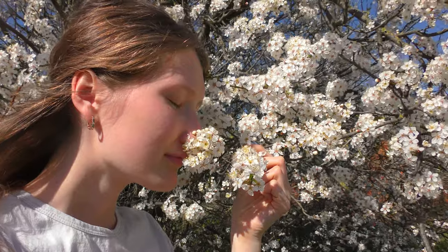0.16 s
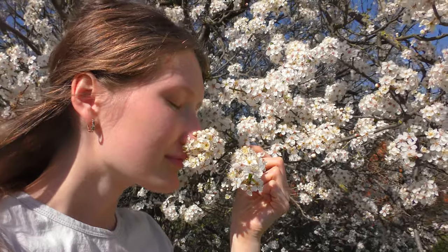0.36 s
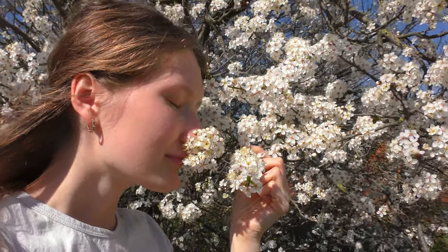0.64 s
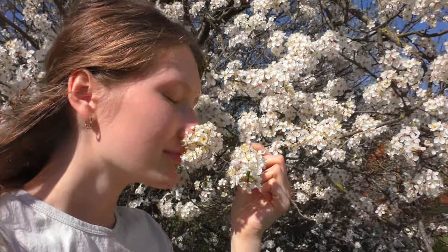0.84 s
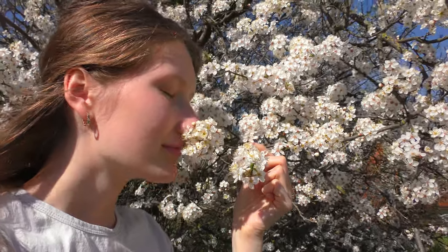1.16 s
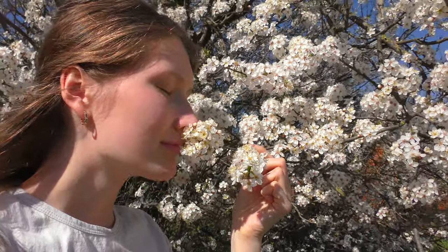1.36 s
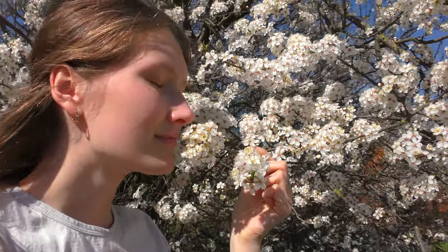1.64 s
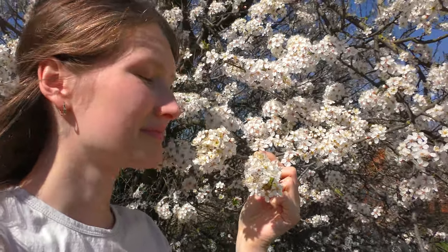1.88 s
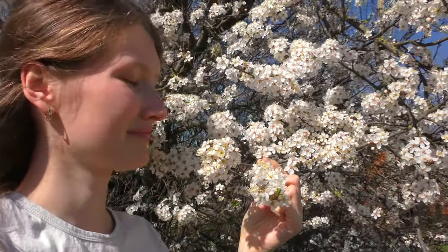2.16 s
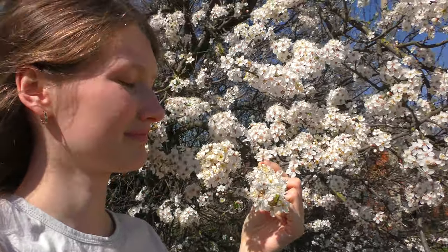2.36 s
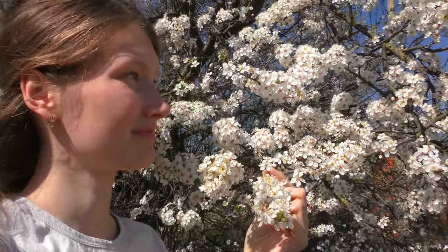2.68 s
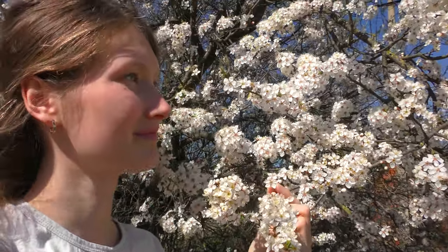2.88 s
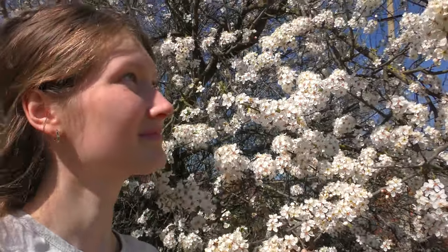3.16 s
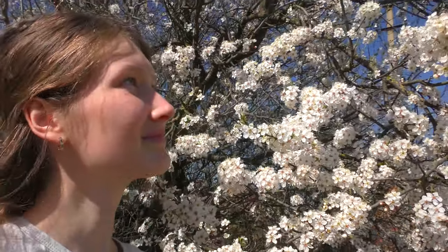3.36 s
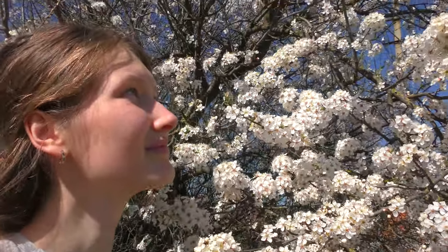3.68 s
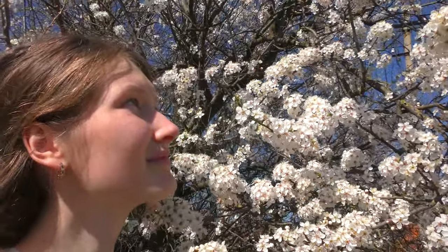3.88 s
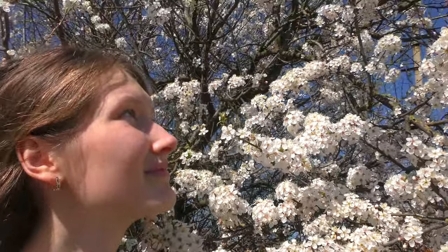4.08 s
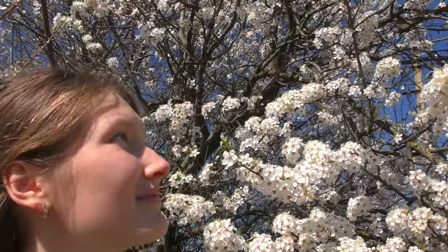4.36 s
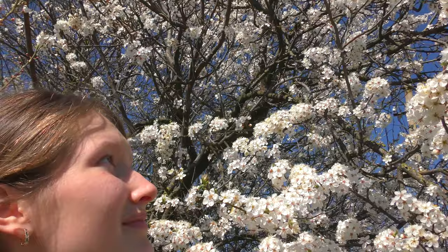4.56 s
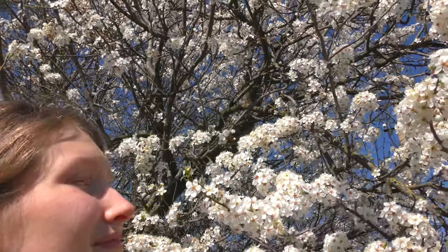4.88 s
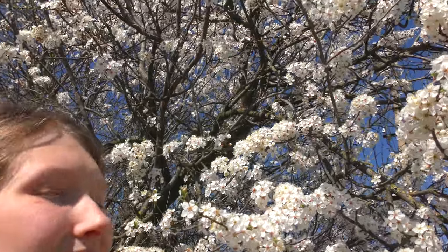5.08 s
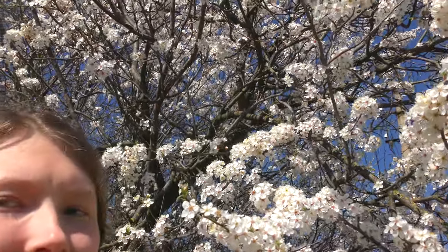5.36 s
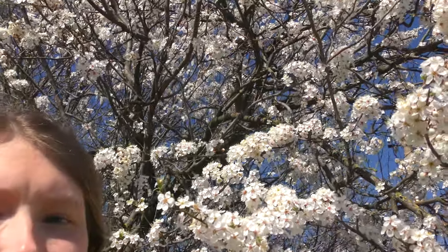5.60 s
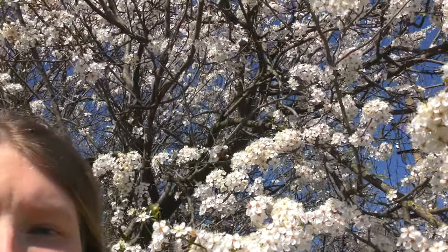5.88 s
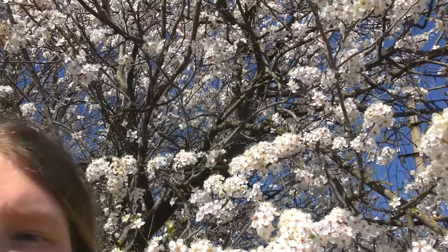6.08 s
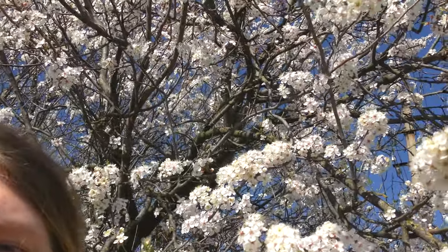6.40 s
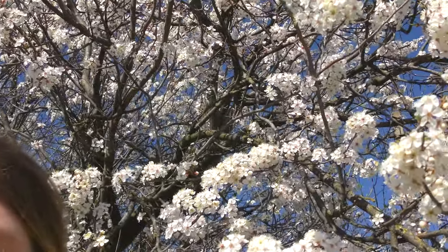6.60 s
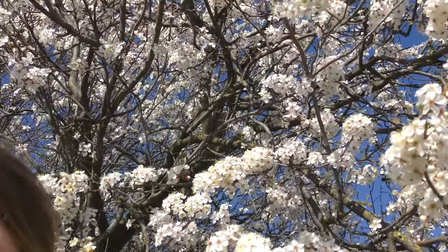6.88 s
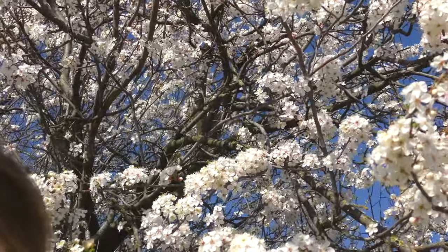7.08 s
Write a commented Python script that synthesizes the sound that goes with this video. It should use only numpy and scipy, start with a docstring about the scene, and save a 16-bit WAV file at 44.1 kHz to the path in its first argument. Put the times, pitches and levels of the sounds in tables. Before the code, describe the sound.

A small songbird twitters in rapid bursts to the left while bees hum faintly in blossom and wind thuds low against the microphone.

```python
"""Bees and a songbird under a flowering tree

Many bees hum softly, each a wandering stack of wingbeat tones, and the nearest one passes again and again.
A small songbird twitters in quick phrases to the left: curved, doubled tones with a faint garden echo.
A few decaying tones make one small ping, and short swells of filtered noise are twigs brushing together.
Gusts of shaped noise and brief pressure swings buffet the microphone, over a steady hush of open air."""
import sys
import numpy as np
from scipy import signal
from scipy.fft import rfft, irfft, next_fast_len
from scipy.io import wavfile

SR = 44100
rng = np.random.default_rng(int(sys.argv[2]) if len(sys.argv) > 2 else 0)


def waveform_to_disk(signal):
    """Save audio, clipped to [-1, 1], as 16-bit WAV at the path in sys.argv[1]."""
    frames = np.transpose(np.atleast_2d(signal))
    scaled = np.clip(frames, -1, 1) * 32767
    samples = np.round(scaled).astype(np.int16)
    wavfile.write(sys.argv[1], SR, samples)


N = 319284
TIME = np.arange(N) / SR  # seconds


def amp(db):
    """Turns decibels into a gain."""
    return 10 ** (np.asarray(db) / 20)


def unit(x):
    """Scales a sound to an rms (average strength) of one."""
    return x / np.sqrt(np.mean(x ** 2) + 1e-20)


def at_hz(points, hz):
    """Reads a curve over frequency, with the frequency axis logarithmic as in hearing."""
    point_hz, value = np.transpose(points)
    return np.interp(np.log(hz + 1), np.log(point_hz + 1), value)


def over_time(rows):
    """Reads a curve over time at every sample."""
    return np.interp(TIME, *np.transpose(rows))


def add(mix, s, sound):
    """Mixes a sound in, starting at a given second."""
    part = mix[max(round(s * SR), 0):][:len(sound)]
    part += sound[:len(part)]


def drift(rate_hz):
    """Makes a random wander of unit size by smoothing away changes faster than the rate."""
    points = rng.standard_normal(2048)
    hz = np.fft.rfftfreq(2048, TIME[-1] / 2047)
    slow = unit(irfft(rfft(points) / (1 + (hz / rate_hz) ** 4)))
    return np.interp(TIME, np.linspace(0, TIME[-1], len(slow)), slow)


def noise(spectrum, likeness):
    """Makes two channels of coloured noise that share a part and differ in the rest."""
    size = next_fast_len(N, True)
    hz = np.fft.rfftfreq(size, 1 / SR)
    common, apart = rfft(rng.standard_normal((2, size))) * amp(at_hz(spectrum, hz))
    same = np.clip(at_hz(likeness, hz), 0, 1)
    mid = common * np.sqrt(1 + same)
    side = apart * np.sqrt(1 - same)
    return unit(irfft([mid + side, mid - side], size)[:, :N])


# Loudness of the whole swarm farther up the tree.
# Each row: time in seconds, level in dB.
SWARM_LEVEL = [(0, -69.5), (1, -63.5), (2.5, -65.5), (3.6, -66.5), (4.3, -69.5), (5.5, -64.5), (6.5, -63),
               (7.24, -71)]


def bees(count=12, wing_hz=224, spread=.07, wander=.022, come_and_go_db=4):
    """Each bee of the swarm beats its wings at its own wandering rate and swells as it flies nearer."""
    swarm = np.zeros((2, N))
    for rank in np.linspace(-1, 1, count):
        buzz = wings(wing_hz * (1 + spread * rank + wander * drift(rate_hz=2.5)))
        place = np.pi / 4 + 0.17 * (rng.random() - .5)  # angle of the pan, near the centre
        pan = [np.cos(place), np.sin(place)]
        swarm += np.outer(pan, buzz * amp(come_and_go_db * drift(rate_hz=2.9)))
    return amp(over_time(SWARM_LEVEL)) * unit(swarm)


# Passes of the nearest bee.
# Each row: time when closest in seconds, average wingbeat rate when closest in Hz, level when closest in dB.
NEAR_BEE_PASSES = [(.9, 220, -75), (2.0, 215.3, -57.5), (4.15, 229.7, -62), (4.97, 214, -63),
                   (6.3, 214, -90), (6.85, 234, -63.5)]


def near_bee(pass_s=0.045, doppler=.006, wander=0.00833):
    """One bee works the closest flowers: on each pass it swells as 1 / distance and its pitch dips."""
    out = np.zeros(N)
    for s, wing_hz, db in NEAR_BEE_PASSES:
        # pass_s is the time to fly as far as the closest distance, which counts as one
        along = (TIME - s) / pass_s
        distance = np.hypot(1, along)
        # doppler is the share of pitch gained on approach and lost on leaving
        hz = wing_hz * (1 - doppler * along / distance + wander * drift(rate_hz=2.85))
        out += amp(db) / distance * wings(hz)
    return out


# Strength of the tones (partials) in a wingbeat, from the first upward.
# Each entry: relative level in dB.
WINGBEAT_PARTIALS = [-7.5, 3, -10.5, -15, -21, -3.5, -3.5, -9]


def wings(hz):
    """The buzz of one bee; each beat has two strokes, so the second partial is the strongest."""
    unsteady_hz = hz * (1 + 0.00532 * drift(rate_hz=31.2))
    phase = (2 * np.pi * (np.cumsum(unsteady_hz) / SR % 1)).astype(np.float32)
    buzz = 0
    for k, db in enumerate(WINGBEAT_PARTIALS):
        buzz = buzz + float(amp(db)) * np.sin((k + 1) * phase)
    return unit(buzz)


def bird(left_db=3.5, echo_left_db=2.0, echo_db=-7.5):
    """The song is louder on the left, the channels a sample apart, with the garden's echo behind it."""
    song = chirps()
    late_song = np.pad(song, (1, 0))[:N]
    direct = amp([[left_db], [-left_db]]) * np.array([late_song, song])
    echo = garden(song * amp(echo_db + facing_db(TIME)))
    return direct + amp([[echo_left_db], [-echo_left_db]]) * echo


# Notes of the song, before the bird's airflow and bends shake them.
# Each row: start in seconds, length in seconds, pitch at the start, middle and end in Hz,
# level halfway through in dB, octave level relative to the main tone in dB.
SONG_NOTES = [(0, 0.017, 6350, 5200, 3960, -52.5, -34), (0, 0.037, 3440, 2900, 2590, -58.5, -15),
              (.032, 0.022, 3000, 3650, 4900, -59, -23), (0.052, 0.045, 5050, 5370, 4780, -58, -25),
              (0.071, .012, 3500, 4300, 4700, -61, -25), (0.097, 0.048, 4500, 4400, 4500, -62, -25),
              (0.142, 0.055, 2870, 3430, 4100, -65.5, -6), (0.512, 0.012, 5000, 4200, 3500, -68, -15),
              (0.535, 0.044, 3080, 3670, 2980, -70, -24), (1.6, 0.048, 4080, 3840, 3320, -63, -16),
              (1.65, 0.017, 4040, 5000, 4800, -57, -11), (1.669, 0.025, 4640, 4490, 4400, -47, -26),
              (1.68, 0.007, 4400, 3950, 3500, -57, -25), (1.711, .024, 3580, 4200, 4830, -61, -27),
              (1.717, 0.019, 4190, 3710, 3200, -57, -27), (1.737, 0.029, 5490, 5640, 5960, -60.5, -20),
              (1.739, .022, 3240, 2960, 2680, -60, -22), (1.767, 0.0097, 4950, 4650, 4100, -51, -25),
              (1.815, 0.042, 3400, 4500, 4570, -56.5, -27), (1.83, 0.023, 5590, 5510, 5400, -54.5, -27),
              (1.852, 0.0081, 5400, 4940, 3900, -58, -23), (1.894, .064, 2820, 3584, 5000, -60.5, -16),
              (1.892, 0.017, 5500, 5750, 6000, -63, -25), (1.953, 0.0069, 4940, 5660, 6040, -56.5, -25),
              (2.476, .016, 4300, 4840, 5570, -72, -20), (2.492, .024, 4740, 3900, 3550, -68, -20),
              (2.526, 0.023, 2970, 3400, 4160, -69, -20), (2.651, 0.017, 4100, 4520, 5070, -62.5, -25),
              (2.67, .04, 2390, 3260, 3080, -62.5, -23), (2.702, .012, 3900, 4780, 5900, -70, -25),
              (2.861, 0.035, 3530, 3980, 4940, -62.5, -12), (2.9, 0.03, 5400, 5800, 5670, -59.5, -25),
              (2.926, 0.025, 6200, 5480, 4100, -61, -25), (2.971, 0.025, 3800, 4400, 5250, -60.5, -25),
              (2.993, 0.063, 5020, 5180, 4420, -58, -25), (3.057, 0.042, 3820, 3970, 4400, -56, -25),
              (3.081, 0.043, 3090, 3450, 4000, -63, -1.5), (3.105, 0.023, 3765, 4140, 4470, -51.5, -18),
              (3.126, 0.028, 4600, 4400, 3760, -48.5, -22), (3.133, .013, 4090, 3600, 3040, -58, -4.5),
              (3.158, 0.024, 3290, 3970, 3620, -52, -29), (3.179, 0.035, 3560, 3230, 3200, -58, -22),
              (3.309, .047, 3640, 2960, 2700, -65, -25), (3.497, 0.029, 4360, 5380, 6840, -55, -27),
              (3.52, 0.024, 4980, 4350, 3750, -54.5, -25), (3.543, .046, 2920, 4250, 5480, -54, -16),
              (3.56, 0.031, 3910, 4000, 5040, -58, -19), (3.574, .022, 3230, 3700, 4870, -52.5, -25),
              (3.589, .032, 5390, 5680, 5330, -48, -30), (3.596, 0.017, 3710, 3084, 3250, -55.5, -25),
              (3.619, 0.011, 5420, 4720, 3600, -49.5, -30), (3.643, 0.059, 3545, 5150, 5430, -54, -29),
              (3.675, 0.023, 3550, 4400, 4700, -55, -25), (3.689, 0.019, 5200, 4750, 3730, -52.5, -33),
              (3.739, 0.031, 3120, 3390, 3440, -62, -2.5), (3.764, .036, 3520, 4150, 5300, -55, -24),
              (3.798, 0.019, 7030, 6050, 5170, -63, -23), (4.032, 0.025, 4470, 5860, 6470, -71, -25),
              (4.066, .014, 5640, 5500, 5240, -66, -25), (4.088, 0.027, 4140, 5000, 6600, -66, -25),
              (4.106, .03, 5770, 5950, 6200, -74, -25), (4.291, 0.056, 3280, 3480, 3360, -74, -25),
              (5.186, 0.034, 4830, 4300, 4300, -69, -25), (5.222, 0.04, 4530, 4350, 3800, -62.5, -24),
              (5.43, 0.019, 4440, 3700, 3520, -62, -20), (5.592, 0.044, 3240, 3710, 3030, -67, -27),
              (5.863, 0.04, 4950, 4750, 4730, -66.5, -25), (5.992, 0.047, 3360, 3730, 4640, -67, -8),
              (6.037, 0.032, 5000, 5830, 5800, -59, -25), (6.069, .024, 5670, 5200, 4160, -58, -25),
              (6.127, 0.067, 3980, 5100, 4900, -65.5, -25), (6.155, 0.034, 4230, 4200, 4280, -62, -27),
              (6.194, 0.08, 4700, 4400, 4100, -71, -25), (6.275, 0.027, 4150, 4370, 5000, -59, -22),
              (6.295, 0.011, 2660, 3020, 3700, -62, 7.5), (6.308, 0.013, 3770, 4220, 3800, -47.5, -20),
              (6.321, 0.018, 3530, 3660, 4000, -58, -4), (6.333, 0.012, 6400, 5200, 4200, -51.5, -23),
              (6.342, 0.019, 2640, 3120, 3250, -56, 7), (6.364, .012, 5900, 5120, 4530, -49.5, -17),
              (6.377, 0.0073, 5240, 4740, 4260, -50.5, -25), (6.603, 0.046, 5700, 4970, 4640, -64.5, -25),
              (6.663, 0.036, 4990, 4650, 3300, -63, -29), (6.935, .022, 3510, 3210, 2900, -63.5, -23),
              (6.957, .014, 2680, 3100, 3600, -61, -25), (6.96, .022, 3870, 3750, 3100, -64, -21),
              (7.079, 0.013, 4100, 4900, 5940, -61.5, -25), (7.095, 0.02, 5470, 3950, 3550, -58.5, -27),
              (7.125, .025, 3070, 3490, 3970, -60.5, -29), (7.15, .03, 3700, 3100, 2750, -68, -27)]
# How strongly the second side of the syrinx (the bird's two-sided voice box) joins in.
# Each row: middle pitch of the note in Hz, level relative to the first side in dB.
SECOND_SIDE = [(3000, -5), (4500, -12), (5700, -3.5)]


def chirps(quaver=0.017, quaver_hz=190, flutter_db=2.13, rasp_db=-10, swell_db=3.5):
    """Each note curves through three pitches; the syrinx's two sides sing at once and beat together."""
    song = np.zeros(N)
    for second in (False, True):
        bend, flutter = drift(rate_hz=quaver_hz), drift(rate_hz=56)
        rasp = unit(signal.lfilter(*signal.butter(2, 650, fs=SR), rng.standard_normal(N)))
        for s, length, start, middle, end, db, octave_db in SONG_NOTES:
            u = np.linspace(0, 1, max(int(length * SR), 64))  # progress through the note
            at = np.clip(int(s * SR) + np.arange(len(u)), 0, N - 1)
            curve = np.polyfit([0, .5, 1], [start, middle, end], 2)
            hz = np.polyval(curve, u) * (1 + quaver * bend[at])
            if second:
                # it sings below the first side, on its own slope
                slope = np.linspace(*rng.uniform(-1.01, 1, 2), len(u))
                hz = hz * (.9 + 0.0283 * slope)
            side_db = second * at_hz(SECOND_SIDE, middle)
            # each note grows from its start to its end, then stops short
            level_db = db + side_db + swell_db * (u - .5) + flutter_db * flutter[at]
            # uneven airflow shakes the tone and spreads it into a rasp
            pressure = amp(level_db) * (1 + amp(rasp_db) * rasp[at])
            add(song, s, branches(pressure * voice(hz, octave_db), facing_db(s)))
    return song


def voice(hz, octave_db, third_db=-15, edge=0.15):
    """One side of the syrinx: a tone with its octave and a third partial weaker than the octave."""
    phase = 2 * np.pi * np.cumsum(hz) / SR
    overtones = amp(octave_db) * (np.sin(2 * phase) + amp(third_db) * np.sin(3 * phase))
    fade = signal.windows.tukey(len(hz), edge)  # edge is the share of the note spent fading in and out
    return np.sqrt(2) * (np.sin(phase) + overtones) * fade


def branches(note, turn_db, count=24, reach_s=0.041, near_db=-9):
    """The nearest branches add a cluster of quick echoes, new for each note as the bird turns."""
    taps = np.zeros(SR // 8)
    late, sign = rng.random(count), rng.choice([-1, 1], count)
    when = ((.001 + late * reach_s) * SR).astype(int)
    taps[when] = sign * np.exp(-2 * late)  # later echoes are weaker
    echoes = signal.fftconvolve(note, taps / np.linalg.norm(taps))
    return np.pad(note, (0, len(taps) - 1)) + amp(near_db + turn_db) * echoes


def facing_db(s, facing_at_s=6.345, facing_for_s=0.06, drop_db=-12.5):
    """The echoes drop, leaving the song driest, while the bird faces the microphone."""
    return drop_db * np.exp(-((s - facing_at_s) / facing_for_s) ** 2)


# How long the garden's echo lasts.
# Each row: frequency in Hz, time to fall by 60 dB in seconds.
GARDEN_ECHO = [(2000, 0.52), (4500, 0.52), (6000, 0.62), (9000, 0.068)]


def garden(x, count=3, turn_hz=3):
    """Scattered echoes that keep changing as the boughs sway; the highest treble dies first."""
    t, out = np.arange(SR) / SR, np.zeros((2, N))
    for k in range(count):
        taps = rng.standard_normal((2, SR)) * (1 - np.exp(-t / 0.0034))
        hz, when, z = signal.stft(taps, SR, nperseg=256)
        decay = amp(-60 * when / at_hz(GARDEN_ECHO, hz)[:, None])
        tail = signal.istft(z * decay, SR, nperseg=256)[1]
        # the squares of the shares sum to one
        share = np.sqrt(2 / count) * np.cos(np.pi * (turn_hz * TIME + k / count))
        out += signal.fftconvolve((x * share)[None], tail / np.linalg.norm(tail[0]), axes=1)[:, :N]
    return out


# Tones (modes) of a faint ping, as of small metal.
# Each row: frequency in Hz, starting level before panning in dB, time to fall by 60 dB in seconds.
PING_MODES = [(2632, -69, 1.5), (3887, -73, 1.0), (4753, -61.5, 1.3), (4764, -75, 1.2)]


def ping(at_s=.187, attack_s=0.0049, left_db=4.0):
    """One light tap sets a few modes ringing; the highest is a close pair that beats as it dies."""
    t, out = np.arange(SR) / SR, np.zeros(N)
    ring = np.zeros(SR)
    for hz, db, t60 in PING_MODES:
        ring += amp(db - 60 * t / t60) * np.sin(2 * np.pi * hz * t)
    add(out, at_s, ring * (1 - np.exp(-t / attack_s)))
    return amp([[left_db], [-left_db]]) * out


# Twigs and petals brushing together.
# Each row: loudest moment in seconds, half length in seconds, centre frequency in Hz,
# width in octaves, level in dB.
TWIG_BRUSHES = [(2.69, 0.01, 11000, 0.42, -64), (3.376, 0.0094, 1890, 0.26, -53.5),
                (3.41, 0.086, 1120, 0.19, -61), (6.888, 0.076, 11100, 0.47, -66)]


def twigs():
    """Each brush is a short swell of noise in one band."""
    out, hz = np.zeros(N), np.fft.rfftfreq(SR, 1 / SR)
    t = np.arange(SR) / SR - .5
    for s, half, centre_hz, octaves, db in TWIG_BRUSHES:
        band = np.exp(-.5 * (np.log2((hz + 1) / centre_hz) / octaves) ** 2)
        rustle = unit(irfft(rfft(rng.standard_normal(SR)) * band))
        add(out, s + t[0], amp(db) * rustle * np.exp(-(t / half) ** 2))
    return out


# Single swirls of air (eddies) that hit the microphone.
# Each row: middle in seconds, peak level in dB, pitch in Hz.
EDDY_HITS = [(2.689, -24, 142), (2.818, -25, 144), (2.864, -16, 167), (2.873, -17.5, 218),
             (2.96, -14.5, 187), (2.982, -29, 265), (3.086, -26.5, 173), (3.148, -27, 138),
             (3.234, -26.5, 162), (3.385, -23.5, 140), (3.923, -37, 80.6), (3.958, -40, 120),
             (4.026, -40.5, 76), (4.16, -41.5, 115), (4.548, -43, 107), (4.792, -39, 111),
             (5.181, -35.5, 132), (5.676, -30.5, 110), (5.903, -32, 76), (6.106, -36, 113),
             (6.383, -36, 112), (6.673, -24.5, 95), (6.734, -26.5, 162)]


def eddies(half_cycles=0.53):
    """Each eddy is a brief push and pull of pressure; smaller ones are higher and shorter."""
    out = np.zeros(N)
    t = np.arange(-2048, 2048) / SR
    for s, db, hz in EDDY_HITS:
        swing = np.sin(2 * np.pi * (hz * t + rng.random()))
        # half_cycles is the half length of the eddy, in cycles of its pitch
        add(out, s + t[0], amp(db) * swing / np.cosh(1.65 * t * hz / half_cycles))
    return out


# Colour of the buffeting in light air and in a strong gust.
# Each row: frequency in Hz, relative level in dB per Hz.
LIGHT_AIR_COLOUR = [(10, -7), (30, -6), (65, 8.5), (110, 2), (170, -10.5), (250, -20), (400, -39),
                    (900, -73)]
GUST_COLOUR = [(10, -26), (30, -28), (65, -3.5), (120, 2.5), (190, -3.5), (270, -12.5), (400, -22),
               (900, -56.5)]
# Strength of the breeze at the microphone as it dies down, gusts and builds again.
# Each row: time in seconds, level in dB.
BREEZE_DYING = [(0.0, -40), (0.07, -47), (0.45, -43), (0.49, -56.5), (0.7, -41), (1.18, -69), (1.7, -58.5),
                (1.71, -56.5), (2.55, -79)]
BREEZE_GUST = [(2.58, -61), (2.626, -46), (2.972, -38.5), (3.002, -40), (3.404, -48.5), (3.5, -58)]
BREEZE_RISING = [(3.55, -86), (3.59, -50), (3.9, -58), (3.91, -54.5), (4.72, -66.5), (4.79, -43),
                 (4.82, -57.5), (5.35, -45.5), (5.5, -53.5), (5.69, -46), (5.72, -54.5), (5.86, -43.5),
                 (6.49, -43), (6.74, -37.5), (6.87, -48.5), (7.12, -44.5), (7.24, -49)]


def wind(still_air_db=-62, lumps_db=3.5, calm_db=-56, gusty_db=-39):
    """Turbulence at the microphone: faster air makes smaller eddies, so it brightens as it grows."""
    breeze = amp(over_time([*BREEZE_DYING, *BREEZE_GUST, *BREEZE_RISING]))
    level_db = 20 * np.log10(np.hypot(breeze, amp(still_air_db)))  # the air never quite stops
    speed = np.clip((level_db - calm_db) / (gusty_db - calm_db), 0, 1)
    likeness = [(25, 0.39), (100, 1.0), (400, 0.88)]  # Hz, likeness of the two channels from 0 to 1
    light = np.sqrt(1 - speed) * noise(LIGHT_AIR_COLOUR, likeness)
    strong = np.sqrt(speed) * noise(GUST_COLOUR, likeness)
    lumps = unit(amp(lumps_db * drift(rate_hz=40)))
    return amp(level_db) * lumps * (light + strong)


# Colours of the open air and of the microphone's steady hiss.
# Each row: frequency in Hz, relative level in dB per Hz.
HUSH_COLOUR = [(88, -9.5), (150, -4), (189, -4), (253, -6), (359, -7), (388, -8), (428, -5.5), (561, -16),
               (812, -15.5), (1130, -9), (1700, -13), (3100, -15), (4200, -23), (6350, -30), (15500, -31)]
HISS_COLOUR = [(1000, -6), (7000, -11.5), (11500, 1.5), (15500, -2)]
# How alike the two channels are, in both the hush and the hiss.
# Each row: frequency in Hz, likeness (coherence) from 0 to 1.
HUSH_LIKENESS = [(60, 0.55), (130, 0.04), (290, 0.56), (640, 0.74), (1410, 0.4), (3100, 0.44), (6820, 1),
                 (15000, 0.4)]
# Slow swell of the hush.
# Each row: time in seconds, change of level in dB.
HUSH_SLOW_SWELL = [(0, -1), (2.1, -.5), (2.5, -2.5), (3.2, -1), (4.0, -0.5), (7.24, -0.8)]


def hush(air_db=-54.16, hiss_db=-65):
    """Distant air and leaves, swelling slowly, over the microphone's steady hiss."""
    air = amp(air_db + over_time(HUSH_SLOW_SWELL)) * noise(HUSH_COLOUR, HUSH_LIKENESS)
    return air + amp(hiss_db) * noise(HISS_COLOUR, HUSH_LIKENESS)


def scene():
    """Everything heard under the tree."""
    return bees() + near_bee() + bird() + ping() + twigs() + eddies() + wind() + hush()


def record(dry, edge_hz=15750):
    """The recorder's steep band limit removes the treble above its edge."""
    low_pass = signal.firwin(511, edge_hz, window=("kaiser", 9), fs=SR)
    return signal.oaconvolve(dry, low_pass[None], "same")


dry = scene()
out = record(dry)
waveform_to_disk(out)
```